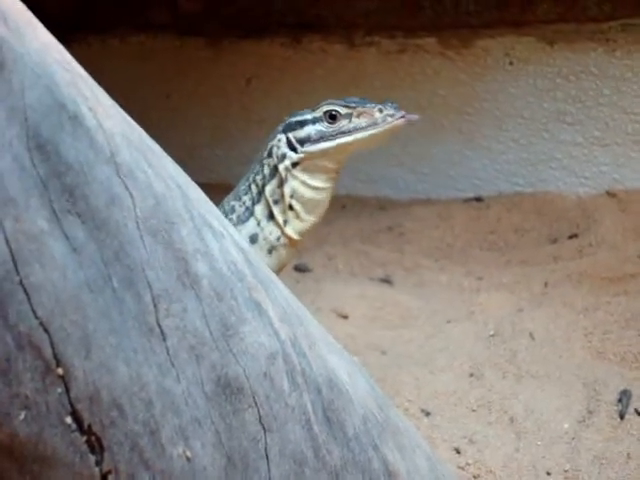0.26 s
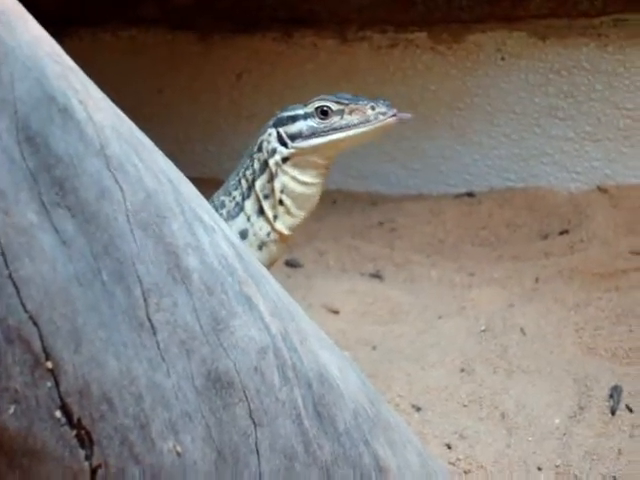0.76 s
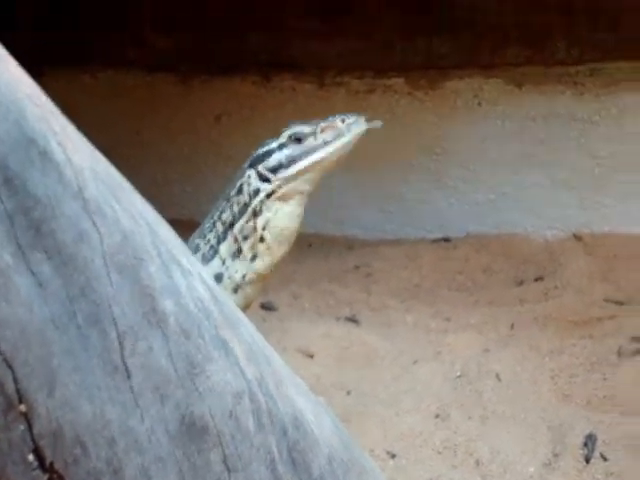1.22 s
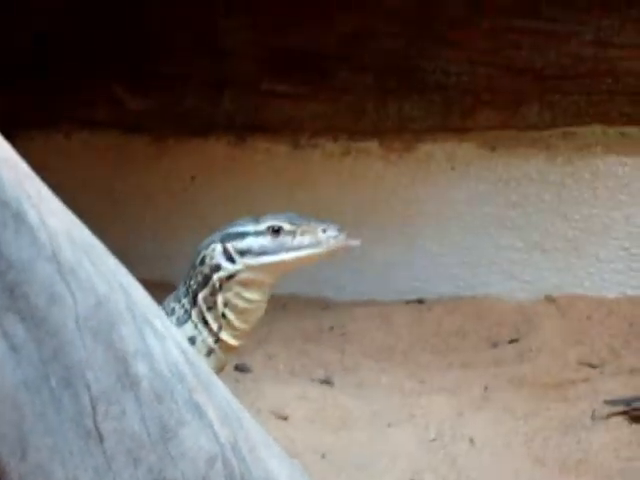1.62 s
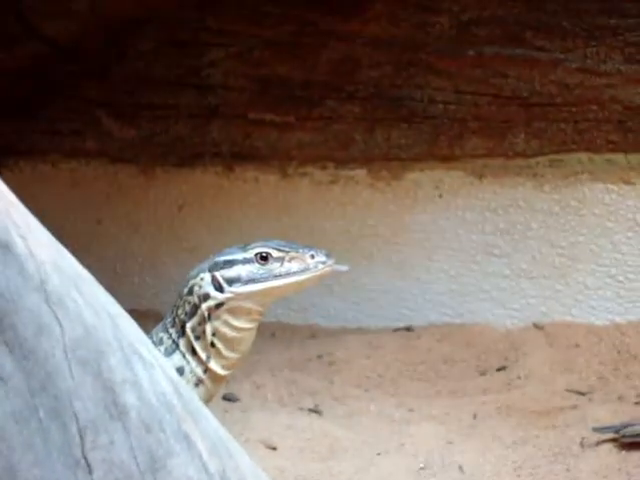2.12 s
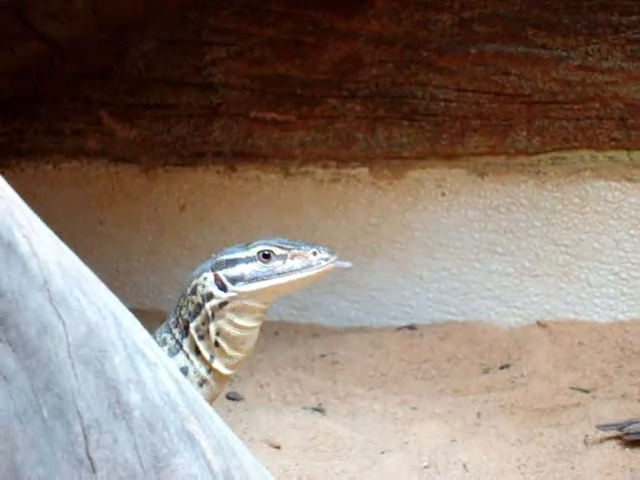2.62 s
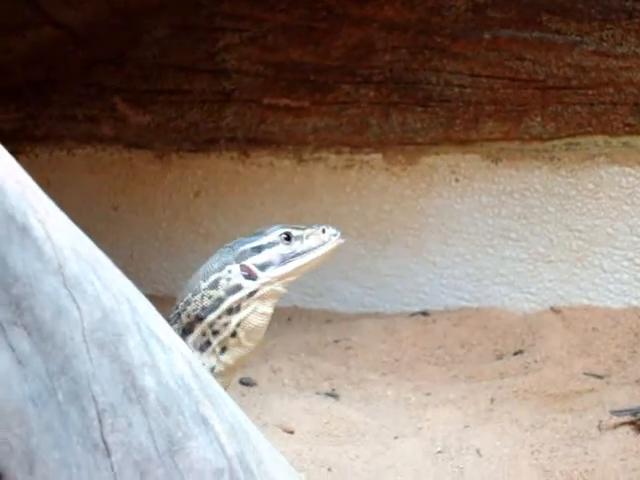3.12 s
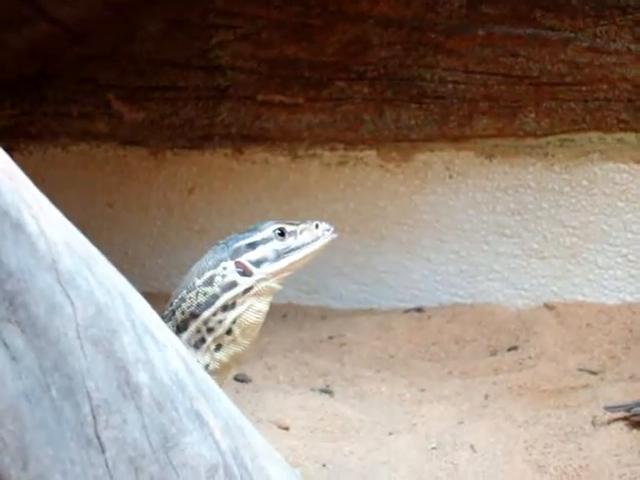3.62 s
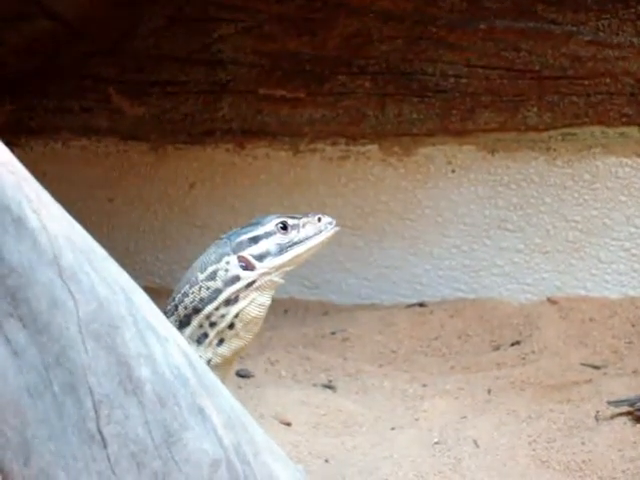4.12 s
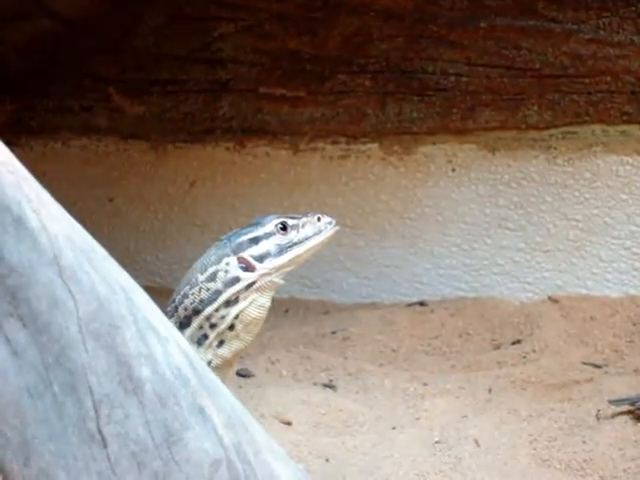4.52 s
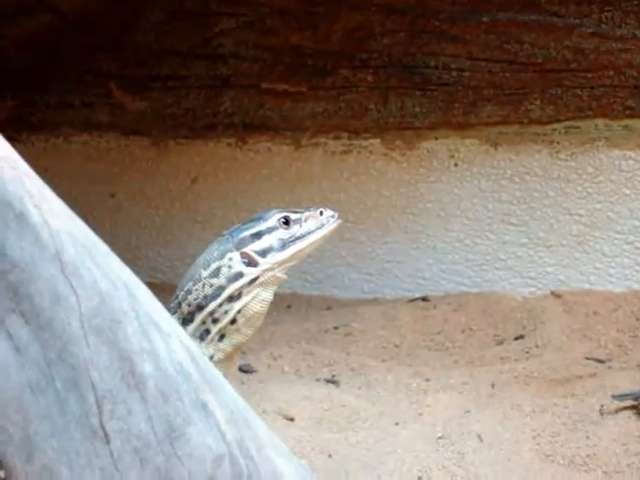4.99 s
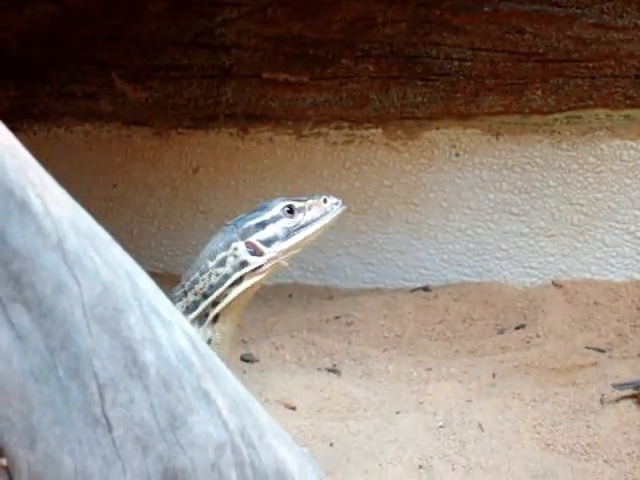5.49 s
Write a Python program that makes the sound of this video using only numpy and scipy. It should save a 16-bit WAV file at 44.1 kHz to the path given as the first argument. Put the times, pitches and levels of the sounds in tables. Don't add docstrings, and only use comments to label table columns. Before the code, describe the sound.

High shrill cricket chirps repeat about twice a second in a small reflective enclosure, with quiet airflow and barely audible scuffs and knocks.

```python
import sys
import numpy as np
from scipy import signal
from scipy.fft import rfft, irfft, next_fast_len
from scipy.io import wavfile
from scipy.ndimage import uniform_filter1d, map_coordinates

SR = 44100
rng = np.random.default_rng(int(sys.argv[2]) if len(sys.argv) > 2 else 0)


def elevation(decibels):
    levels = np.asarray(decibels, float)
    return 10 ** (levels / 20)


def transcribe(u):
    v = np.clip(np.atleast_2d(u).T, -1, 1)
    q = np.round(v * 32767).astype(np.int16)
    wavfile.write(sys.argv[1], SR, q)


N = 253575
T = np.arange(N) / SR


def unit(x):
    return x / np.sqrt(np.mean(x ** 2) + 1e-20)


def along(points, hz):
    f, v = np.transpose(points)
    return np.interp(np.log(hz + 1), np.log(f + 1), v)


def filtered(x, response):
    m = next_fast_len(len(x) + 8192)
    return irfft(rfft(x, m) * response(np.fft.rfftfreq(m, 1 / SR)), m)[:len(x)]


def wobble(rate):
    return map_coordinates(rng.standard_normal(int(N * rate / SR) + 4), [T * rate])


def add(track, s, x):
    part = track[max(round(s * SR), 0):][:len(x)]
    part += x[:len(part)]


# (f/Hz, level/dB per Hz)
AIR = [(13, -51), (22, -19), (54, -20.5), (125, -7), (366, -0.5), (461, -0.5), (565, -1), (809, -2),
       (1570, -6.5), (2080, -7.5), (3380, -9.5), (4840, -20.5), (6410, -10), (9900, -17.5), (12900, -40),
       (21800, -120)]
# (f/Hz, level/dB rms)
WHINE = [(1491, -71), (2018, -71.5), (7585, -69)]


def room_air():
    z = signal.stft(rng.standard_normal(N + 512), nperseg=512)[2]
    patches = uniform_filter1d(rng.standard_normal(z.shape), size=8, axis=0)
    patches = uniform_filter1d(patches, size=10, axis=1)
    rush = signal.istft(z * elevation(0.93 * unit(patches)), nperseg=512)[1][:N]
    rush = unit(filtered(rush, lambda hz: elevation(along(AIR, hz))))
    tones = np.zeros(N)
    for hz, db in WHINE:
        level = elevation(db + 3 + 2 * wobble(4))
        tones += level * np.sin(2 * np.pi * hz * T + 1.3 * wobble(8))
    return elevation(-48.5 + 0.3 * wobble(2)) * rush + tones


def narrow_haze():
    center_hz, width_hz = 4850, 400
    haze = filtered(rng.standard_normal(N), lambda hz: np.exp(-((hz - center_hz) / width_hz) ** 2))
    return elevation(-61.5 + 1.6 * wobble(6)) * unit(haze)


# (f/Hz, time to fade 60 dB t/s)
BOX = [(3000, 0.24), (7000, 0.26)]


def crickets(strokes, lead, swell, unsteady_hz, direct_db, glass_t60, trim_db):
    out, t = np.zeros(N), np.arange(SR // 4) / SR
    for s, db, hz, length, room_db, fall in strokes:
        chance = rng.standard_normal((4, len(t)))
        u = np.clip(t / length, 0, 1)
        drift = unit(uniform_filter1d(chance[0], size=90))
        pitch = hz * (1 + fall * (0.25 - u ** 1.797)) + unsteady_hz * drift
        tone = np.sin(np.pi * u) ** swell * np.sin(2 * np.pi * np.cumsum(pitch) / SR)

        panes = np.sign(chance[1]) * (np.abs(chance[1]) > 2.8)
        glass = (panes + 0.019 * chance[3]) * elevation(-60 * t / glass_t60)
        glass /= np.linalg.norm(glass)
        glass[0] += elevation(direct_db)
        tail = chance[2] * elevation(-60 * t / along(BOX, hz)) * (1 - np.exp(-t / 0.014))

        close = signal.fftconvolve(tone, glass)[:len(t)]
        late = signal.fftconvolve(tone, tail)[:len(t)]
        energy = np.linalg.norm(tone)
        both = close / np.linalg.norm(close) + elevation(room_db) * late / np.linalg.norm(late)
        add(out, s - lead, elevation(db + trim_db) * energy * both)
    return out


# (t/s, peak level/dB, f/Hz)
SECOND = [(0.0024, -25, 4914), (0.0594, -27.5, 4837), (0.0294, -29, 4665), (0.6554, -43, 4550),
          (0.7044, -25.5, 4860), (0.7517, -25, 4890), (1.367, -36, 4650), (1.4062, -24.5, 4793),
          (1.4344, -23.5, 4960), (1.8547, -32, 4900), (2.169, -40.5, 4670), (2.2298, -27.5, 4813),
          (2.2594, -44, 4820), (2.2907, -27.5, 4793), (2.7696, -43.5, 4630), (2.812, -29, 4873),
          (2.8599, -29.5, 4700), (2.8779, -29.5, 4990), (3.455, -43, 5180), (3.4825, -33.5, 5030),
          (3.5109, -28.5, 4864), (3.5594, -30, 4910), (3.6072, -34.5, 4910), (4.0716, -37.5, 4660),
          (4.12, -29.5, 4940), (4.1609, -28.5, 4920), (4.3645, -29.5, 5320), (3.458, -39, 4620),
          (3.519, -37.5, 5240)]


def second_cricket():
    length_s, room_db, fall = 0.029, -1, 0.06
    strokes = [(s, db, hz, length_s, room_db, fall) for s, db, hz in SECOND]
    return crickets(strokes, lead=0.0056, swell=0.23, unsteady_hz=75.7,
                    direct_db=1.5, glass_t60=0.071, trim_db=-3.0)


# (t/s, stroke spacing t/s, first level/dB, change per stroke level/dB, f/Hz)
DISTANT = [(0.0894, .035, -35, -3, 4890), (0.385, 0.029, -41, -2, 5260), (0.5591, 0.029, -49, 2.5, 5020),
           (0.8094, 0.023, -36, 1.4, 5024), (0.9428, .015, -48, 1, 5070), (1.4994, 0.031, -34.5, -2, 4950),
           (1.685, 0.03, -34.5, -0.5, 5100), (1.998, .03, -58, -1, 5050), (2.3194, .016, -37, -5, 4770),
           (2.5394, .034, -32.5, 0, 5230), (2.7142, 0.01, -42.5, -5.5, 5080),
           (2.9194, 0.019, -38.5, -2, 4820), (4.1994, 0.035, -34.5, -3.5, 4780),
           (4.52, 0.024, -36.5, 0.6, 5110), (4.6603, 0.035, -33.5, -2, 5660),
           (5.1994, .031, -30, -2.1, 4850), (5.4494, .02, -58, 0.5, 5170)]


def distant_crickets():
    length_s, room_db, fall = 0.0311, -2.4, 0.028
    tiring_db, scatter_hz = 0.4, 68.3
    scatter = scatter_hz * rng.standard_normal((len(DISTANT), 5))
    strokes = []
    for (s, gap, db, step_db, hz), offset in zip(DISTANT, scatter):
        for k in range(5):
            level_db = db + k * step_db - tiring_db * k * k
            strokes.append((s + k * gap, level_db, hz + offset[k], length_s, room_db, fall))
    return crickets(strokes, lead=0.0055, swell=0.32, unsteady_hz=90,
                    direct_db=-2.5, glass_t60=0.15, trim_db=-3.5)


# (t/s, peak level/dB, f/Hz, silent gap before it t/s)
NEAR = [(0.24, -23.5, 4746, .006), (0.292, -18.5, 5030, 0.017), (0.339, -17.5, 5050, 0.022),
        (1.0161, -22, 4770, .006), (1.063, -16.5, 4850, .02), (1.462, -14.5, 4900, .004),
        (1.899, -20.5, 4800, 0.019), (1.945, -21, 5066, .008), (2.411, -27, 4650, 0.017),
        (2.4655, -16, 4870, 0.025), (2.5157, -16.5, 4980, 0.012), (3.0794, -25.5, 4650, 0.0056),
        (3.133, -17, 4890, 0.015), (3.1857, -17.5, 4965, 0.015), (3.6653, -21.5, 4784, 0.025),
        (3.724, -15.5, 4924, .012), (3.775, -17, 4890, 0.019), (4.3725, -22, 4840, 0.0044),
        (4.425, -15.5, 4956, 0.017), (4.484, -17, 4870, 0.013), (5.0534, -25, 4665, 0.013),
        (5.101, -15.5, 4913, 0.014), (5.155, -16.5, 4950, 0.03), (5.643, -21, 4770, 0.0039),
        (5.69, -15.5, 4960, 0.021)]


def near_cricket():
    length_s, fall = 0.02702, 0.072
    inside_room_db, last_room_db = -3.5, -19.5
    wait = np.diff([row[0] for row in NEAR], append=np.inf)
    strokes = []
    for (s, db, hz, _), until_next in zip(NEAR, wait):
        room_db = inside_room_db if until_next < 0.1 else last_room_db
        strokes.append((s, db, hz, length_s, room_db, fall))
    return crickets(strokes, lead=0.006, swell=0.24, unsteady_hz=69,
                    direct_db=5.0, glass_t60=0.14, trim_db=-5.0)


# (t/s, peak level/dB, length t/s)
SCUFFS = [
    (1.194, -45.5, 0.023),
    (1.549, -45.5, 0.022),
    (4.645, -47.5, 0.099),
    (4.93, -51, 0.049),
    (5.435, -47, 0.04),
    (5.488, -48, 0.032),
]
# (f/Hz, level/dB per Hz)
GRIT = [(200, -28), (1000, -5), (3000, 3), (5000, -2), (7500, 0.5), (9500, -3)]


def scuffs():
    out = np.zeros(N)
    for s, db, length in SCUFFS:
        u = np.arange(round(length * SR)) / (length * SR)
        grains = rng.standard_normal(SR // 4) * elevation(3 * rng.standard_normal(SR // 4))
        grains = unit(filtered(grains, lambda hz: elevation(along(GRIT, hz))))
        add(out, s, elevation(db + 1) * np.sin(np.pi * u) ** 0.13 * grains[:len(u)])
    return out


# (t/s, peak level/dB, f/Hz)
BUMPS = [
    (4.448, -49, 125),
    (4.849, -46, 129),
    (5.17, -50, 112),
    (5.43, -49.5, 124),
    (5.536, -47, 125),
]


def bumps():
    out, t = np.zeros(N), np.arange(SR // 3) / SR
    for s, db, hz in BUMPS:
        ring = elevation(db - 2.5 - 60 * t / 0.27) * (1 - np.exp(-t / 0.014))
        add(out, s, ring * np.sin(2 * np.pi * hz * t))
    return out


def scene():
    room = room_air() + narrow_haze()
    singers = second_cricket() + distant_crickets() + near_cricket()
    return (room + singers + scuffs() + bumps())[None]


# (offset t/s, length t/s, depth level/dB)
AFTER_STROKE = (0.0287, 0.006, -26)
# (middle t/s, length t/s, depth level/dB)
STRAY_MUTES = [(0.263, 0.014, -24), (0.651, 0.012, -20), (0.678, 0.018, -18), (0.805, 0.0094, -33),
               (1.634, 0.011, -18), (1.675, .013, -13), (1.829, 0.025, -12), (1.993, 0.036, -18),
               (2.312, 0.009, -21), (3.439, 0.009, -13), (3.828, 0.033, -17), (4.09, 0.027, -12),
               (5.194, 0.011, -33)]


def mutes():
    gap_ends_s, gap_db, second_gap_s = 0.0053, -26, 0.0186
    faint_db, fades_db = -42, 22
    sudden = [(s, gap) for s, _, _, gap in NEAR]
    sudden += [(SECOND[k][0], second_gap_s) for k in (5, 7, 15, 24)]
    before = [(s - gap_ends_s - gap / 2, gap, gap_db) for s, gap in sudden]
    offset, length, depth = AFTER_STROKE
    after = []
    for s, db, _, _ in NEAR:
        after.append((s + offset, length, depth * np.clip((db - faint_db) / fades_db, 0, 1)))
    return before + after + STRAY_MUTES


def envelope(x):
    return np.sqrt(np.abs(uniform_filter1d(x ** 2, size=450)))


# (low f/Hz, high f/Hz, noise under the band level/dB, spill under the chirp level/dB)
CAMERA_BANDS = [(3900, 4400, -6, -32), (4400, 5150, -11, -30), (5150, 5500, -4, -20),
                (5500, 6400, -14, -32)]


def starved_camera(x):
    chirps = lambda hz: (hz > 4350) & (hz < 5600)
    chirp_level = envelope(filtered(x, chirps))
    for low, high, own_db, spill_db in CAMERA_BANDS:
        inside = lambda hz: (hz > low) & (hz < high)
        level = elevation(own_db) * envelope(filtered(x, inside)) + elevation(spill_db) * chirp_level
        x = x + level * unit(filtered(rng.standard_normal(N), inside))
        blocks = np.clip(1.66 + 0.91 * wobble(260), 0, 1)
        x = x + filtered(filtered(x, inside) * (unit(blocks) - 1), inside)
    gate_db = np.zeros(N)
    for s, length, db in mutes():
        gate_db += db * np.clip(1.6 - np.abs(T - s) / length * 5.2, 0, 1)
    gated = x + filtered(x, chirps) * (elevation(gate_db) - 1)
    return filtered(gated, lambda hz: hz < 10000)


def held_samples(x):
    slow = signal.resample_poly(x, 320, 441)
    return slow[np.minimum(np.arange(N) * 32000 // SR, len(slow) - 1)]


def low_pass(x):
    return signal.sosfilt(signal.butter(12, 16990, fs=SR, output="sos"), x)


def record(dry):
    mirrored = held_samples(starved_camera(dry[0]))
    mix = filtered(mirrored, lambda hz: hz < 15750)[None]
    return low_pass(mix)


dry = scene()
out = record(dry)
transcribe(out)
```